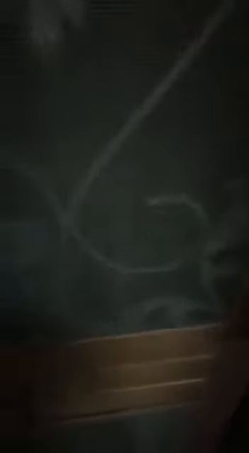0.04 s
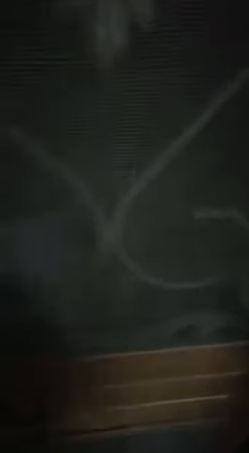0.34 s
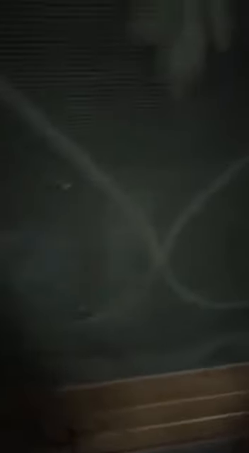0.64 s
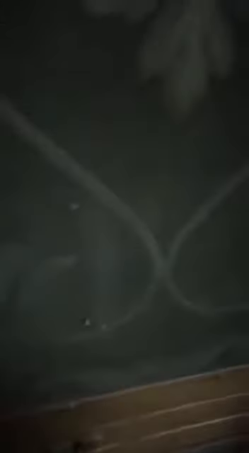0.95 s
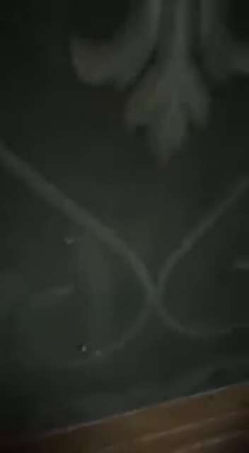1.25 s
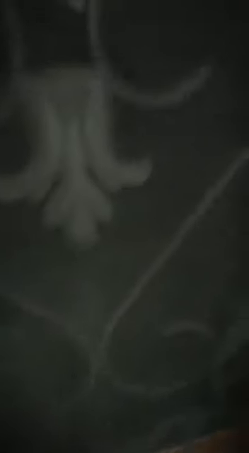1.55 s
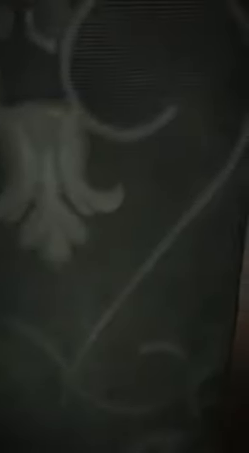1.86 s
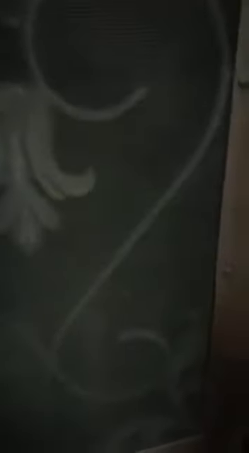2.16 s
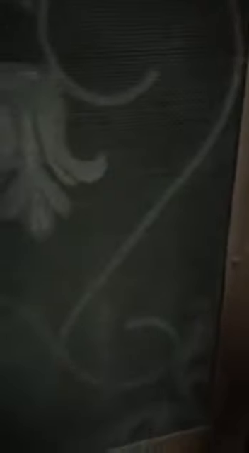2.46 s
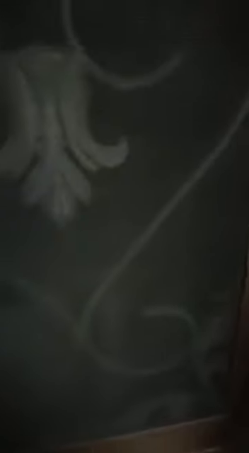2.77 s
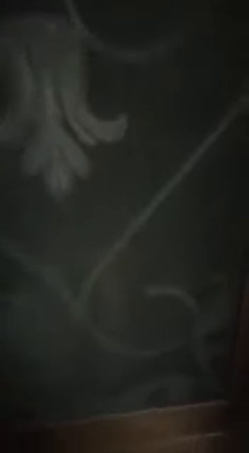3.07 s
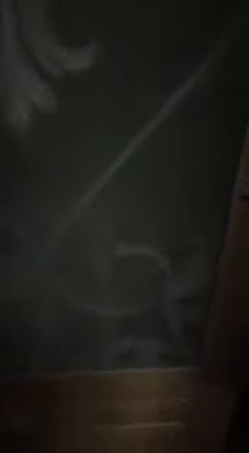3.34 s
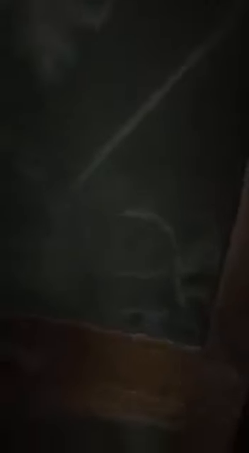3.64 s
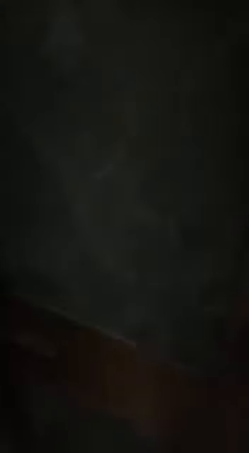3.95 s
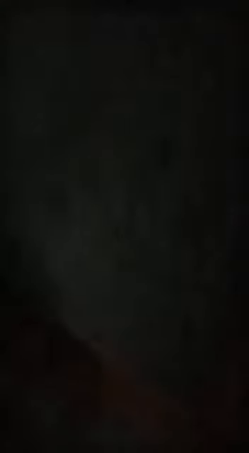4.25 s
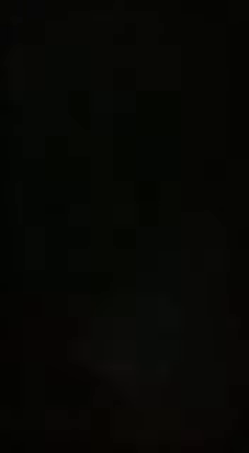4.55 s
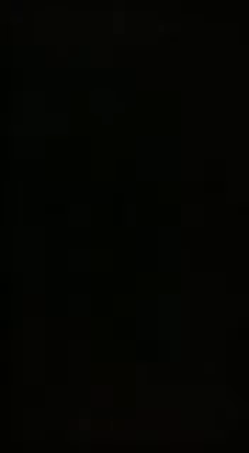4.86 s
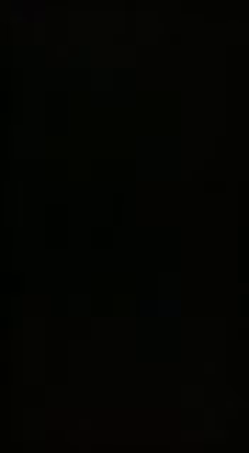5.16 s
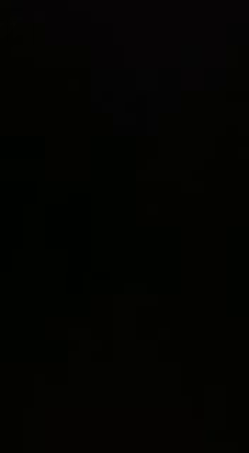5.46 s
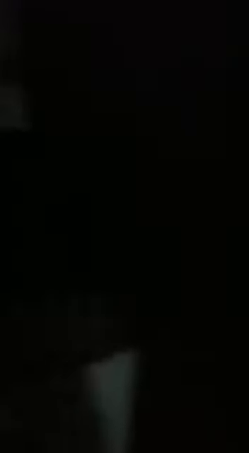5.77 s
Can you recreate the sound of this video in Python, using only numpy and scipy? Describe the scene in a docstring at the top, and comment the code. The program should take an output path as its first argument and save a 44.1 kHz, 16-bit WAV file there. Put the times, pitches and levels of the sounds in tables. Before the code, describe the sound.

Close handling of a mesh screen door: latch clicks, clattering metal knocks, then a thin hinge squeal and a grinding creak.

```python
"""A metal screen door

A mesh screen door is handled close by in a small, hard room. Its latch clicks, impacts excite the
modes of the frame, and the loose mesh rattles. As the door swings, stick-slip friction makes the dry
hinges squeal, slow into a grinding creak and end in single slips. A low rumble fills the room."""
import sys
import numpy as np
from scipy import signal
from scipy.fft import rfft, irfft, next_fast_len
from scipy.io import wavfile
from scipy.ndimage import map_coordinates

SR = 44100
rng = np.random.default_rng(int(sys.argv[2]) if len(sys.argv) > 2 else 0)


def generate_wav(signal):
    """Clip the signal to [-1, 1] and save it as 16-bit WAV at the path in sys.argv[1]."""
    frames = np.transpose(np.atleast_2d(signal))
    scaled = np.clip(frames, -1, 1) * 32767
    pcm = np.round(scaled).astype(np.int16)
    wavfile.write(sys.argv[1], SR, pcm)


N = 256220
TIME = np.arange(N) / SR  # seconds into the scene
AGE = np.arange(SR) / SR  # seconds into a one-second sound


# Each row: start in seconds, then strength, body, treble and leftward lean in dB.
FRAME_KNOCKS = [(0.002, 0.5, -5.5, -6, 6.5), (0.015, -6.5, -3.5, -16, -9), (2.285, -12, -40, -9.5, 1),
                (2.343, 3.5, 0, -6.5, 0), (2.498, -7.5, 2, -34, -4), (2.535, -5, -18, -21.5, 3),
                (2.553, 4.5, 5.5, -14.5, 0.5), (2.558, 14, -4, -6, 1), (2.822, 8, -17, -8, -3.5),
                (2.834, 12, -7.5, -10, -2.5), (2.868, 9.5, -4, -7, -2.5), (2.894, 13.5, -10, 2, -8.5),
                (2.9, 14.5, -9, -3.5, 6), (2.963, 7.5, -1, -3, 0.5), (2.972, 6, 2, 3, 0),
                (3.193, -7.5, 7.5, -24, -6.5), (3.274, -11, 4.5, -31, -4.5), (3.329, -23, 0.5, -8, 9.5),
                (3.544, -17.5, -1, -29, -2.5)]
# Spectrum of a knock. Each row: frequency in Hz, gain in dB.
KNOCK_SPECTRUM = [(71, -40.5), (120, -25), (360, -16.5), (662, -15), (955, -10.5), (1230, -11), (1560, -13),
                  (1830, -5), (2170, -12.5), (2540, -12), (3100, -18), (3900, -23), (5960, -20.5),
                  (6460, -24.5), (7450, -20.5), (8080, -25.5), (10700, -28.5), (14000, -42.5), (15500, -44)]
# Each row: start in seconds, strength in dB.
JAMB_BUMPS = [(2.562, -3.5), (2.691, -11.5), (2.737, -8.5), (2.823, -22), (2.898, -25)]
# Each row: frequency in Hz, level in dB, time to decay by 60 dB in seconds.
FRAME_MODES = [(555, -19, .4), (780, -18, .6), (926, -14, .45), (1001, -18, .5), (1125, -19, .45),
               (1410, -16, .3), (1720, -8, .4), (1771, -5, .45), (1830, -4, .42), (1868, 0, .46),
               (1901, -5, .35), (1996, -4, .45), (2077, -7, .38), (2160, -10, .28), (2318, -10, .35),
               (2401, -12, .38), (2494, -12, .3), (2548, -8, .33), (2616, -13, .38), (3058, -18, .3)]
JAMB_MODES = [(175.3, -0.5, 0.32), (201.3, -2, 0.13), (238, 3, 0.13), (280, -5, 0.11)]

def knocks():
    """Impact excites normal modes: the frame hits its catch and rings; the jamb takes the weight."""
    out = np.zeros((2, N))
    for start, db, body_db, treble_db, pan_db in FRAME_KNOCKS:
        hit = impact(KNOCK_SPECTRUM, body_db, treble_db)
        ring = amp(-1) * ringing(FRAME_MODES)
        add(out, start, amp(db) * panned(hit + ring, pan_db))
    for start, db in JAMB_BUMPS:
        add(out, start, amp(db) * ringing(JAMB_MODES))
    return out


# Each row: multiple of the fundamental, level in dB.
THIN_HARMONICS = [(2, 2.5), (3, -3), (4, -14.5)]
REEDY_HARMONICS = [(2, 14), (3, 10), (4, -2.5), (5, -0.5), (6, -8), (7, -7), (8, -4.5), (9, -7.5),
                   (10, -20)]
# Slower slipping is less steady. Each row: pitch in Hz, roughness as a share of the pitch.
SLIP_ROUGHNESS = [(900, .024), (1030, .015), (1350, .011), (2400, .0105), (3000, .002)]

def squeal(length, first_hz, settled_hz, fundamental_db, overtones_db):
    """Stick-slip oscillation: a dry hinge slips so fast that it sings, unsteady in pitch and grip."""
    settle_s, fade_db_per_s = 0.016, 32
    hz = settled_hz + (first_hz - settled_hz) * np.exp(-AGE / settle_s)
    roughness = along(SLIP_ROUGHNESS, settled_hz)
    waver = roughness * (0.7 * wobble(60, size=SR) + wobble(1100, size=SR))
    phase = 2 * np.pi * np.cumsum(hz * (1 + waver)) / SR
    flutter_db = min(250 * roughness, 3) * wobble(129.5, size=SR)
    gate = held(AGE, length, attack_s=0.014, release_s=0.011)
    envelope = gate * amp(flutter_db - fade_db_per_s * AGE)
    harmonics = REEDY_HARMONICS if settled_hz < 1800 else THIN_HARMONICS
    overtones = sum(amp(db) * np.sin(round(k) * phase) for k, db in harmonics)
    return envelope * (amp(fundamental_db) * np.sin(phase) + amp(overtones_db) * overtones)


# Each row: start and length in seconds, first and settled pitch in Hz, fundamental and overtones in dB.
HINGE_SQUEALS = [(3.698, 0.058, 2530, 2292, -38, -49), (3.734, 0.037, 2297, 2430, -33, -41),
                 (3.783, 0.096, 2412, 2435, -31, -37.5), (3.802, 0.042, 1487, 1300, -36, -48.5),
                 (3.862, 0.09, 1392, 1330, -35.5, -54.5), (3.887, 0.068, 2330, 2325, -35, -39),
                 (3.951, 0.12, 2435, 2387, -36.5, -42), (4.109, 0.015, 2213, 2327, -31.5, -46),
                 (4.134, 0.052, 3460, 3150, -32.5, -56), (4.137, 0.048, 2740, 2817, -36.5, -52),
                 (4.18, 0.106, 2975, 3025, -25, -36.5), (4.319, 0.091, 798, 915, -44.5, -48.5),
                 (4.328, 0.052, 2973, 3073, -33.5, -49), (4.33, 0.071, 1480, 1552, -44, -58),
                 (4.454, 0.046, 1480, 1076, -46, -47), (4.488, 0.049, 1060, 1017, -44, -39.5)]
# Each row: peak time in seconds, level in dB, rise and fall in seconds.
HINGE_SCRAPES = [(4.07, -45, 0.53, 0.2), (4.37, -50.5, 0.072, .1), (4.6, -35, 0.18, 0.16),
                 (5.35, -42.5, 0.19, 0.032)]

def squealing_hinges():
    """Sliding friction: the hinges sing over a soft, grainy scrape as the door swings."""
    song = np.zeros((1, N))
    for start, *shape in HINGE_SQUEALS:
        add(song, start, squeal(*shape)[None])
    grains = rng.standard_normal(N) * amp(3.5 * wobble(900))
    scrape_tilt = [(700, -10), (1800, -8.0), (5000, -9.5), (12000, 9)]
    song += unit(coloured(grains, CREAK_SPECTRUM, scrape_tilt)) * swells(HINGE_SCRAPES)
    # The door's own resonances make each overtone flutter as its pitch moves.
    resonance = amp(-11) * burst(t60=0.015) + amp(-5) * room_tail()
    song = coloured(song, [(9500, 1), (12500, -4.5), (15000, -11)])
    return panned(song + convolved(song, resonance), -1.0)


def slips(age, first_rate):
    """Relaxation oscillation, slowing after a push: fast slips lock into a pitch, slow ones stumble."""
    slowing_per_s, slowest_slips_per_s = 8.6, 42
    rate = np.maximum(first_rate * np.exp(-slowing_per_s * age), slowest_slips_per_s)
    looseness = 50 / rate
    uneven_rate = rate * np.exp(0.24 * looseness * wobble(130))
    slip_count = np.floor(np.cumsum(uneven_rate) / SR)
    grip_db = 2.5 * wobble(110) + (1 + 1.5 * looseness) * rng.standard_normal(N)
    return np.diff(slip_count, prepend=0) * np.sqrt(SR / rate) * amp(grip_db)


# Each row: start and length in seconds, first rate in slips per second, creak and treble levels in dB,
# treble slope in dB per second, panel level in dB.
DOOR_PUSHES = [(4.535, 0.29, 900, -26.5, -34, -68, -40), (5.09, 0.26, 730, -29.5, -39.5, 11, -34.5)]
# Spectrum of a slip. Each row: frequency in Hz, gain in dB.
CREAK_SPECTRUM = [(290, -36.5), (500, -12), (758, -13.5), (1030, -11), (1310, -17), (1900, 0.5), (2330, -5),
                  (2840, -3), (3190, -13.5), (3680, -9), (4070, -19), (5510, -14), (9370, -28.5),
                  (13600, -44.5), (15500, -85.5)]

def creak():
    """Forced vibration: each slip of the hinge kicks frame and panel; at a crawl the door judders."""
    creak_fade_db_per_s, panel_fade_db_per_s = 13.5, 77
    kicks = np.zeros((3, N))
    for start, length, first_rate, creak_db, treble_db, treble_slope, panel_db in DOOR_PUSHES:
        age = np.maximum(TIME - start, 0)
        train = slips(age, first_rate) * held(age, length, attack_s=0.025, release_s=0.04)
        kicks += train * amp([creak_db - creak_fade_db_per_s * age,
                              treble_db + treble_slope * age,
                              panel_db - panel_fade_db_per_s * age])
    metal = impact(CREAK_SPECTRUM, body_db=-1.5, treble_db=0.5, t60=0.04, room_db=-3.0)
    low = unit_energy(coloured(metal, [(2600, 0.5), (3600, -8.5), (5500, -34)]))
    high = unit_energy(coloured(metal, [(2800, -41), (4200, -14)]))
    ring = amp(-10) * ringing(FRAME_MODES)
    responses = [low + ring, high, panel()]
    grind = sum(convolved(kick, response) for kick, response in zip(kicks, responses))
    return panned(grind + judder(metal), -0.22)


# Each row: start, length and gap between slips in seconds, opening level in dB.
JUDDER_RUNS = [(4.495, 0.07, 0.044, -3), (4.64, 0.14, 0.023, -1), (4.872, 0.21, 0.0283, 1.5)]

def judder(metal):
    """Periodic impulses: slow, evenly spaced slips thump the panel in fading runs."""
    fade_db_per_s, scatter_db = 48, 1.5
    out = np.zeros((2, N))
    for start, length, gap, db in JUDDER_RUNS:
        for age in np.arange(0, length, gap):
            thump_db = db - fade_db_per_s * age + scatter_db * rng.standard_normal()
            add(out, start + age, amp(thump_db) * (panel() + amp(-9.5) * metal))
    return out


# Each row: frequency in Hz, level in dB, time to decay by 60 dB in seconds.
PANEL_MODES = [(299, -5.5, 0.13), (365.3, 6, 0.076), (392.7, 0.5, 0.12), (427.6, 4, 0.062)]

def panel():
    """Impulse response of the door panel: low, damped modes give a hollow voice, with its echo."""
    spread = unit_energy(burst(t60=0.012) + amp(-9) * room_tail())
    return unit_energy(convolved(ringing(PANEL_MODES), spread)[:, :SR])


# Each row: start in seconds, then strength, body, treble, leftward lean and ring in dB.
LATCH_SNAPS = [(0.498, 4.5, 3.5, 2.5, -2, -5), (0.603, -10, -18, -3, 3, -5),
               (1.217, -6.5, -4.5, 1, 0.5, -16), (2.586, 2.5, 6.5, 7, -3, -13.5)]
HINGE_SLIPS = [(4.542, 2, 1, -5, -1, -2), (4.902, -6, 7.5, -4, 4.5, -23), (4.924, 8.5, 0.5, -2.5, -1, -23),
               (5.014, -6, 15.5, -2.5, 4, -3), (5.319, -12, -15, -3.5, 11, -11),
               (5.344, -11, -16, 3, -9, -17), (5.362, -15, 4, -3, 18, 0.5), (5.396, -1, -1.5, -0.5, 3, -4),
               (5.49, 10.5, -2.5, 1, 0, -14), (5.581, 7.5, 0, 4, -0.5, -13.5)]
# Each row: frequency in Hz, gain in dB.
LATCH_SPECTRUM = [(240, -27), (400, -15.5), (503, -13), (942, 0), (1080, -7.5), (1380, -3.5), (1510, -4),
                  (2880, -1), (3160, -12), (3410, -4.5), (4290, -13), (7440, -7), (10600, -13),
                  (15500, -40.5)]
HINGE_SPECTRUM = [(240, -41), (400, -18), (519, -13), (683, -11), (1030, -5), (1360, -9.5), (2030, 4),
                  (2590, 2), (4160, -16), (5480, 0.5), (6190, -8), (9070, -5), (12300, -14), (15500, -40)]
# Each row: frequency in Hz, level in dB, time to decay by 60 dB in seconds.
LATCH_MODES = [(1422, 1, .09), (2450, -8, .2), (2933, -3, .16), (3300, -3, .09), (3450, 2, .12),
               (3640, -2, .08), (7622, -9, .05), (8033, -8, .05)]

def clicks(events, spectrum, modes):
    """A brief contact has a broad spectrum: small steel parts snap, bright and short, and ring."""
    out = np.zeros((2, N))
    for start, db, body_db, treble_db, pan_db, ring_db in events:
        snap = impact(spectrum, body_db, treble_db)
        ring = amp(ring_db) * ringing(modes)
        add(out, start, amp(db) * panned(snap + ring, pan_db))
    return out


# Each row: peak time in seconds, level in dB, rise and fall in seconds.
MESH_SHAKES = [(0.01, -29, 0.09, 0.087), (0.42, -58.5, 0.15, 0.36), (1.23, -42, 0.027, 0.038),
               (1.79, -60, 0.22, 0.32), (2.05, -69, 0.11, 0.14), (2.555, -27, 0.06, 0.067),
               (2.7, -45, 0.43, 0.25), (2.835, -21.5, 0.028, 0.087), (2.97, -31, 0.022, 0.027),
               (3.05, -39.5, 0.035, 0.21)]

def mesh_chatter():
    """Shot noise: with each shake, many tiny random contacts of the mesh keep the frame ringing."""
    contacts_per_s = 350
    contacts = unit((rng.random(N) < contacts_per_s / SR) * rng.standard_normal(N))
    ring = amp(-3) * ringing(FRAME_MODES)
    hit = impact(KNOCK_SPECTRUM, body_db=0.5, treble_db=0.5, t60=0.075, room_db=-3.0)
    return convolved(contacts * swells(MESH_SHAKES), ring + hit)


def impact(spectrum, body_db, treble_db, t60=0.05, room_db=-4.5):
    """Source and filter: one contact and its echo, with its own share of body and treble."""
    tilt = [(1400, body_db), (1720, 0), (2600, 0), (3700, treble_db)]
    strike = burst(t60) + amp(room_db) * room_tail()
    return unit_energy(coloured(strike, spectrum, tilt))


def burst(t60):
    """Modal overlap: the dense ring of thin metal is noise that falls 60 dB in t60 seconds."""
    return unit_energy(noise_pair(SR) * amp(-60 * AGE / t60))


def ringing(modes):
    """Superposition of damped modes, at new strengths for every blow and microphone."""
    hz, db, t60 = np.transpose(modes)[:, :, None]
    waves = amp(db) * np.sin(2 * np.pi * hz * AGE) * np.exp(-np.log(1000) * AGE / t60)
    signs = rng.choice([-1, 1], len(modes))
    weights = signs * amp(2 * rng.standard_normal((2, len(modes))))
    return unit_energy(weights @ waves)


# Each row: frequency in Hz, reverberation time in seconds.
ROOM_DECAY = [(200, 1), (900, 0.66), (2000, 0.73), (4000, 0.53), (8000, 0.31), (15000, 0.2)]

def room_tail():
    """Reverberation: the room's echo decays exponentially, treble first."""
    hz, age, spectra = signal.stft(noise_pair(SR), SR, nperseg=256)
    decay = amp(-60 * age / along(ROOM_DECAY, hz)[:, None])
    tail = signal.istft(spectra * decay, SR, nperseg=256)[1][:, :SR]
    onset = 1 - np.exp(-AGE / 0.00072)
    return unit_energy(tail * onset)


# Each row: frequency in Hz, gain in dB.
ROOM_NOISE_SPECTRUM = [(12, -43), (20, -7), (39, 0), (103, -9), (140, -0.5), (219, -12), (252, -14.5),
                       (667, -20.5), (932, -17), (1230, -25.5), (1770, -20.5), (2030, -21), (3170, -28),
                       (4190, -35.5), (15500, -51.5)]
RUMBLE_SPECTRUM = [(15, -6.5), (32, -17), (60, -3), (150, -9.5), (250, -13.5), (500, -27), (1500, -100)]
# Each row: peak time in seconds, level in dB, rise and fall in seconds.
RUMBLE_SWELLS = [(0.1, -49, 0.6, 1.2), (2.74, -42.5, 0.47, .1), (3.27, -48.5, .5, .25),
                 (4.4, -47.5, 2.3, 2.3), (5.7, -48, 1.8, 1.5)]

def background():
    """Ambient noise: a steady floor, and a low rumble that swells as the door moves."""
    floor = unit(coloured(noise_pair(N), ROOM_NOISE_SPECTRUM))
    rumble = unit(coloured(noise_pair(N), RUMBLE_SPECTRUM))
    return amp(-52.0) * floor + swells(RUMBLE_SWELLS) * rumble


# Each row: frequency in Hz, correlation of left and right from -1 to 1.
STEREO_CORRELATION = [(60, 0.99), (130, 1), (290, 0.85), (600, -0.9), (1300, 0.23), (2200, -0.19),
                      (5000, -0.052), (15000, -0.082)]

def noise_pair(size):
    """Spatial coherence: white noise as two spaced microphones hear it."""
    padded = next_fast_len(size, True)
    correlation = along(STEREO_CORRELATION, np.fft.rfftfreq(padded, 1 / SR))
    angle = np.arccos(np.clip(correlation, -1, 1)) / 2
    spectra = rfft(rng.standard_normal((2, padded)))
    mid, side = irfft(spectra * [np.cos(angle), np.sin(angle)], padded)[:, :size]
    return unit(np.array([mid + side, mid - side]))


def amp(db):
    """Decibels to gain."""
    return 10 ** (np.asarray(db) / 20)


def unit(x):
    """Scale to rms 1."""
    return x / np.sqrt(np.mean(x ** 2) + 1e-20)


def unit_energy(x):
    """Scale a response to a mean energy of 1 per channel."""
    return unit(x) / np.sqrt(x.shape[-1])


def along(points, hz):
    """Interpolate (Hz, value) points on a log frequency axis."""
    knots_hz, values = np.transpose(points)
    return np.interp(np.log(hz + 1), np.log(knots_hz + 1), values)


def wobble(knots_per_s, size=N):
    """A smooth random curve."""
    knots = rng.standard_normal(int(size * knots_per_s / SR) + 4)
    return map_coordinates(knots, [TIME[:size] * knots_per_s])


def held(age, length, attack_s, release_s):
    """Attack, hold and release of a sound that is age seconds old."""
    return np.clip(age / attack_s, 0, 1) * np.clip(1 + (length - age) / release_s, 0, 1)


def swells(rows):
    """Summed exponential swells; rise and fall are the times for a tenfold change of gain."""
    return sum(amp(db) * 10 ** -np.maximum((peak - TIME) / rise, (TIME - peak) / fall)
               for peak, db, rise, fall in rows)


def coloured(x, *curves):
    """Minimum-phase filter whose gain is the sum of curves of (Hz, dB) points."""
    size = 2 * next_fast_len(x.shape[-1] // 2 + 4096)
    hz = np.fft.rfftfreq(size, 1 / SR)
    gain_db = sum(along(curve, hz) for curve in curves)
    cepstrum = irfft(np.log(amp(gain_db) + 1e-6))
    cepstrum[1:size // 2] *= 2  # folding onto positive time makes the filter causal
    cepstrum[size // 2 + 1:] = 0
    return irfft(rfft(x, size) * np.exp(rfft(cepstrum)))[..., :x.shape[-1]]


def panned(x, db):
    """Lean a sound to the left by a level difference of db."""
    return x * amp([[db / 2], [-db / 2]])


def convolved(x, response):
    """Pass x through a stereo impulse response."""
    return signal.fftconvolve(np.atleast_2d(x), response, axes=1)[:, :N]


def add(track, start, sound):
    """Mix a sound in at start seconds."""
    part = track[:, max(0, round(start * SR)):][:, :sound.shape[-1]]
    part += sound[:, :part.shape[-1]]


def scene():
    """Superposition: the sounds of the door and its room add."""
    latch = clicks(LATCH_SNAPS, LATCH_SPECTRUM, LATCH_MODES)
    single_slips = clicks(HINGE_SLIPS, HINGE_SPECTRUM, FRAME_MODES)
    return background() + knocks() + latch + single_slips + mesh_chatter() + squealing_hinges() + creak()


# The left microphone is the duller one. Each row: frequency in Hz, left minus right in dB.
MICROPHONE_BALANCE = [(2000, 0.5), (4400, -2.5), (9000, -1), (12000, -13), (15000, -5)]

def record(dry):
    """Clipping at full scale, the frequency responses of two unlike microphones, and a band limit."""
    top_hz = 15600
    size = next_fast_len(N + 4096)
    hz = np.fft.rfftfreq(size, 1 / SR)
    balance = amp(np.outer([0.5, -0.5], along(MICROPHONE_BALANCE, hz)))
    spectrum = rfft(np.clip(dry, -1, 1), size)
    return irfft(spectrum * balance * (hz < top_hz), size)[:, :N]


dry = scene()
out = record(dry)
generate_wav(out)
```